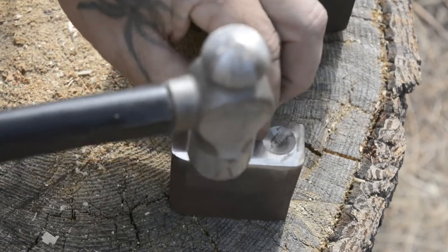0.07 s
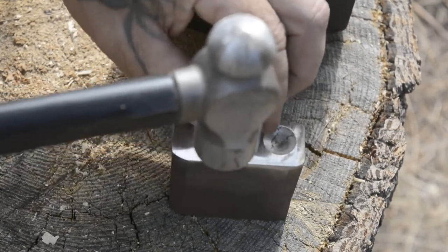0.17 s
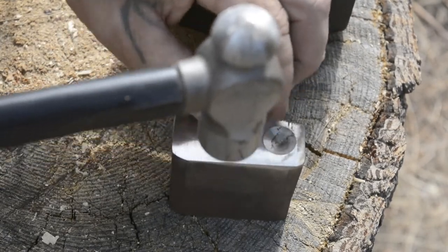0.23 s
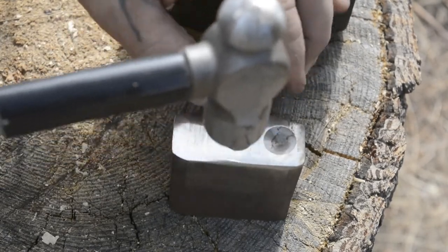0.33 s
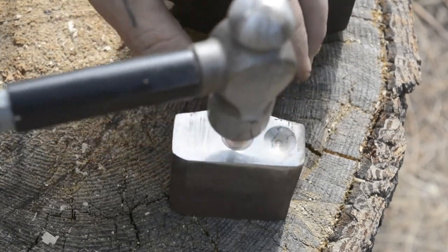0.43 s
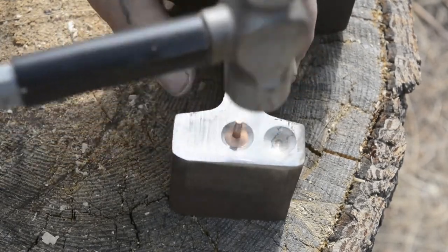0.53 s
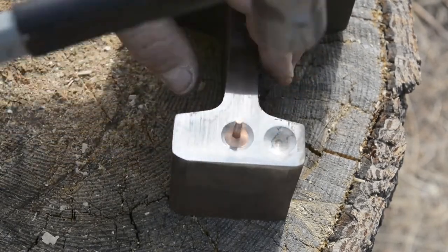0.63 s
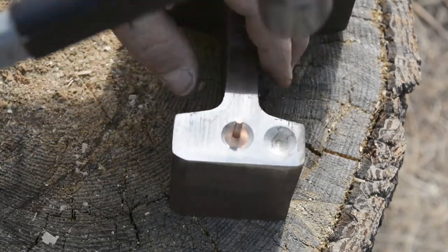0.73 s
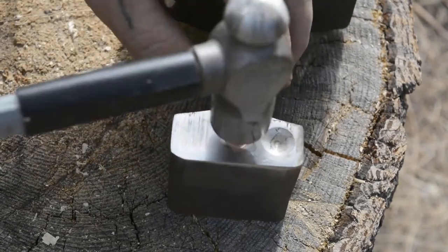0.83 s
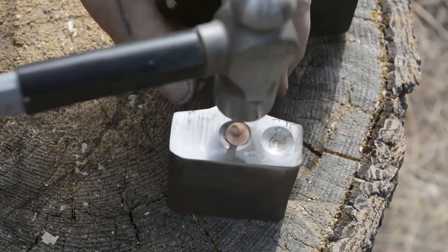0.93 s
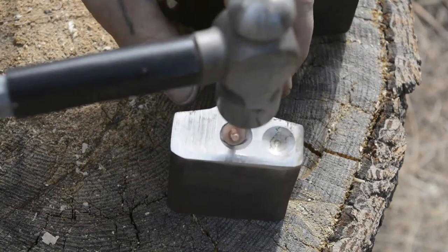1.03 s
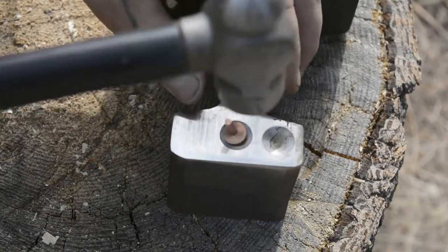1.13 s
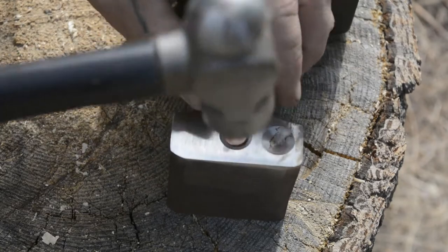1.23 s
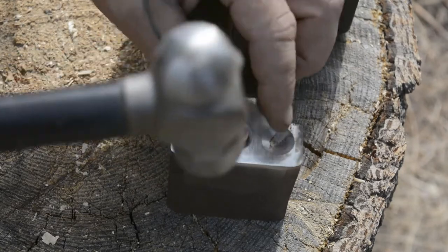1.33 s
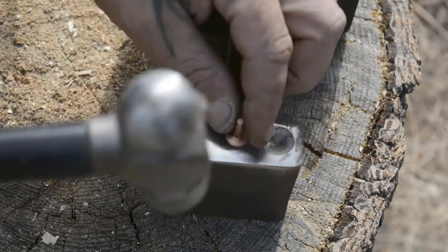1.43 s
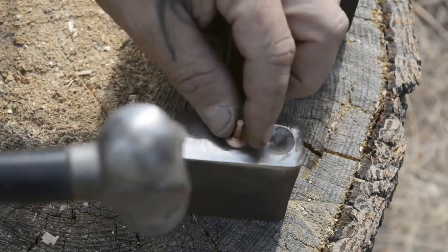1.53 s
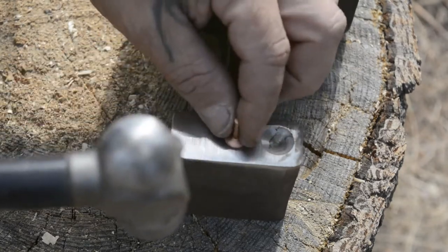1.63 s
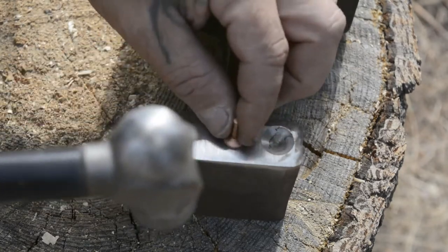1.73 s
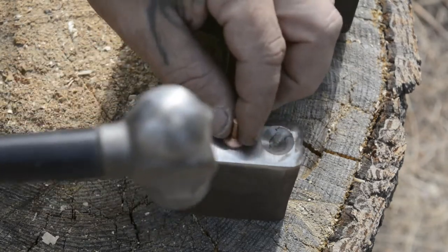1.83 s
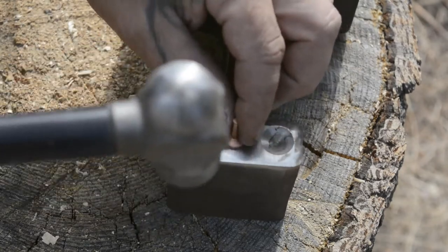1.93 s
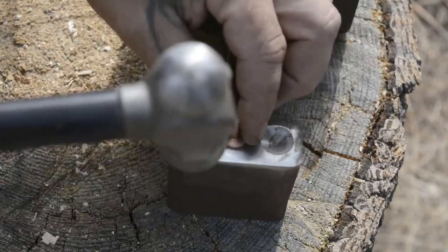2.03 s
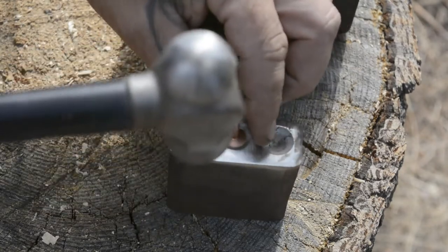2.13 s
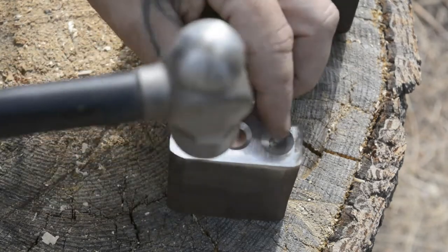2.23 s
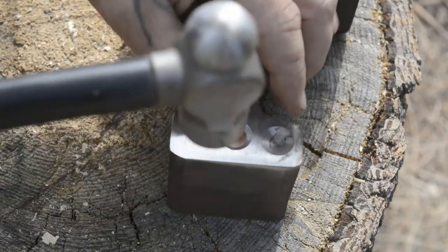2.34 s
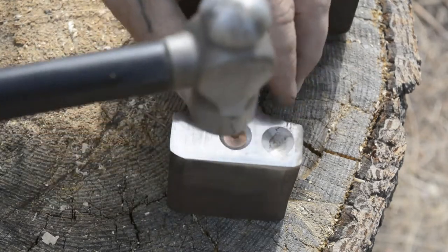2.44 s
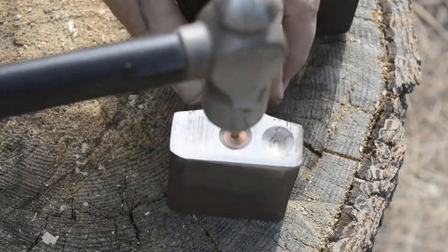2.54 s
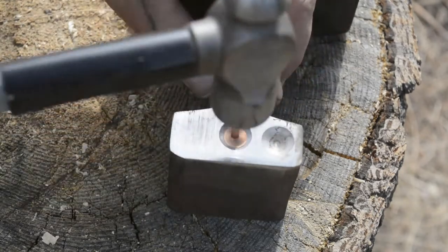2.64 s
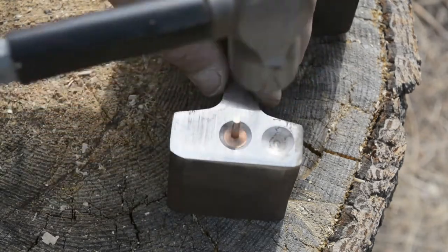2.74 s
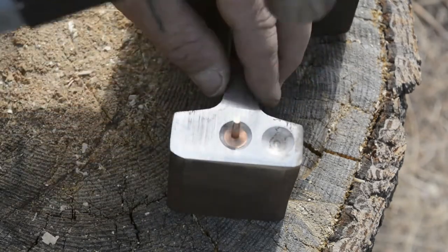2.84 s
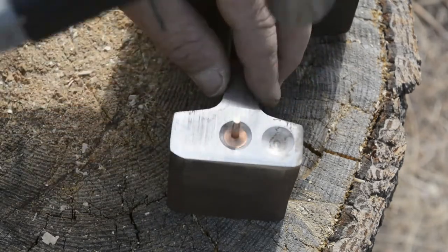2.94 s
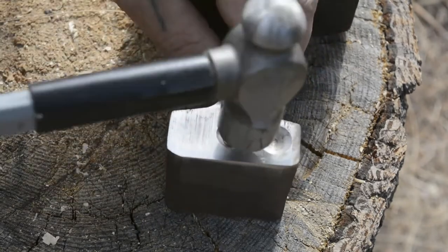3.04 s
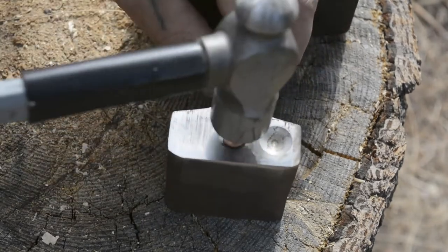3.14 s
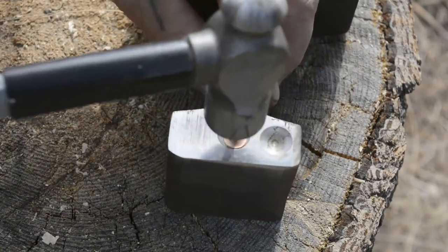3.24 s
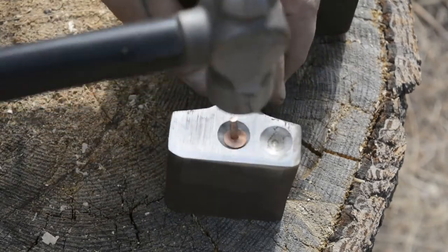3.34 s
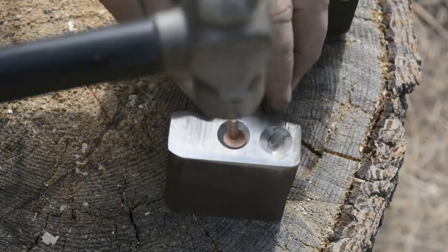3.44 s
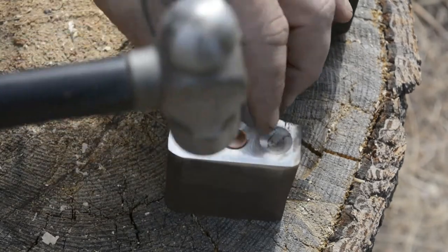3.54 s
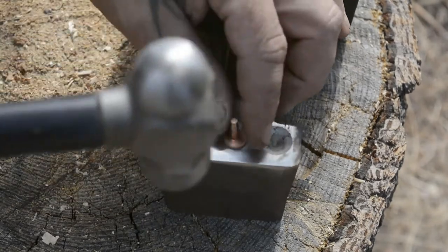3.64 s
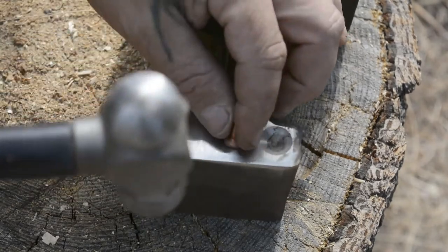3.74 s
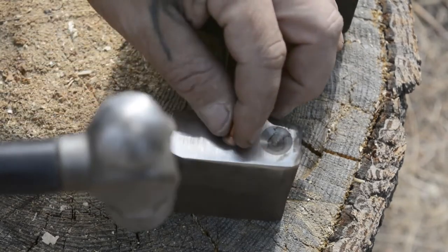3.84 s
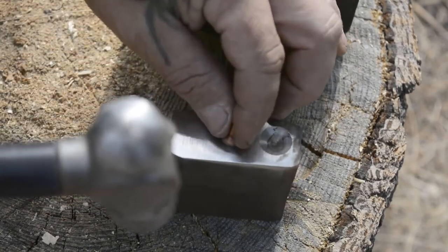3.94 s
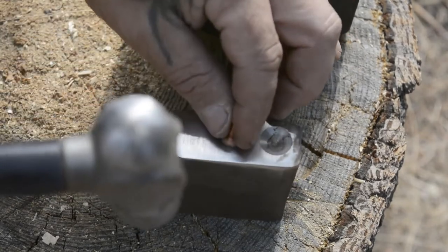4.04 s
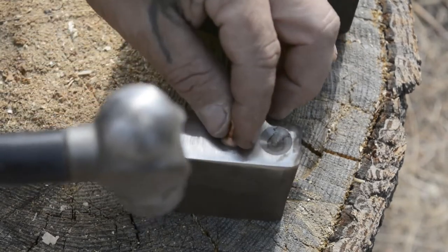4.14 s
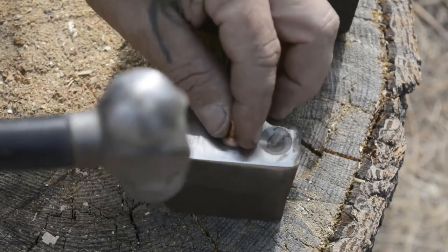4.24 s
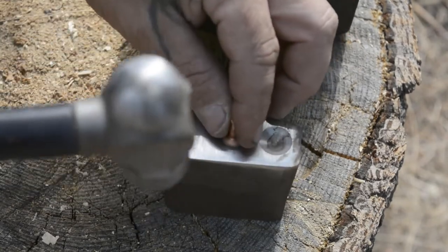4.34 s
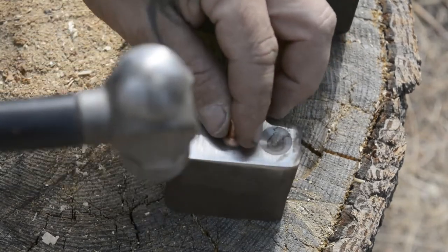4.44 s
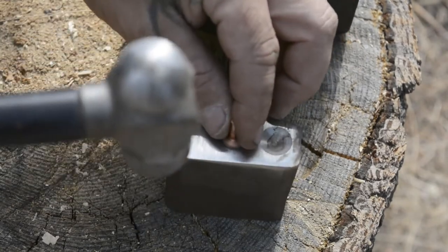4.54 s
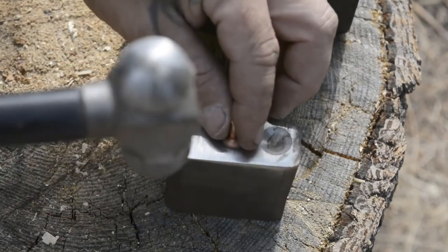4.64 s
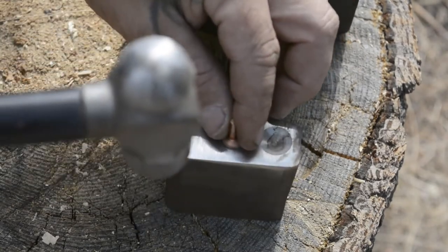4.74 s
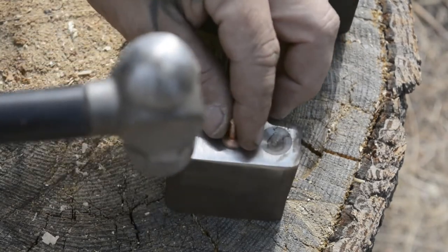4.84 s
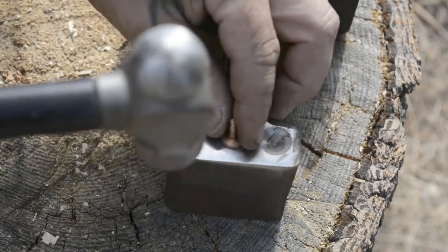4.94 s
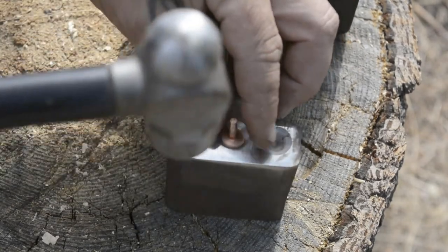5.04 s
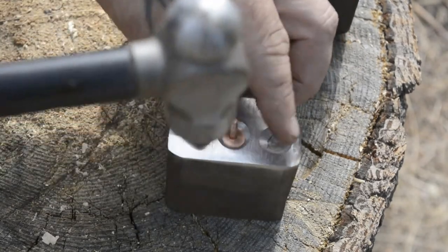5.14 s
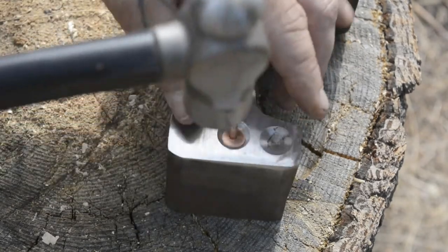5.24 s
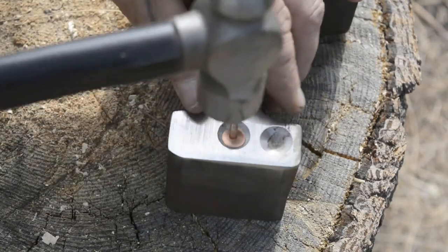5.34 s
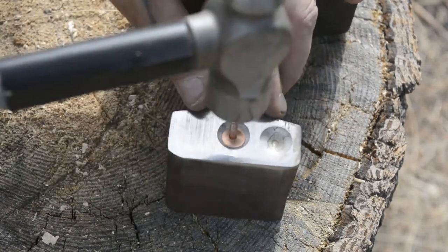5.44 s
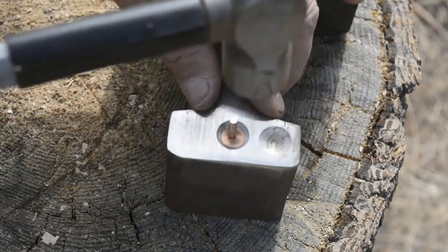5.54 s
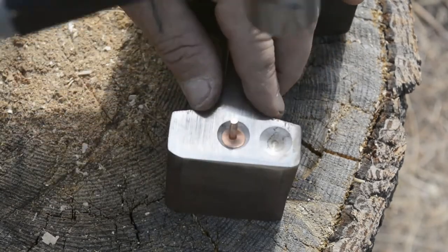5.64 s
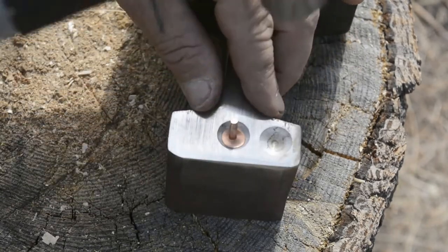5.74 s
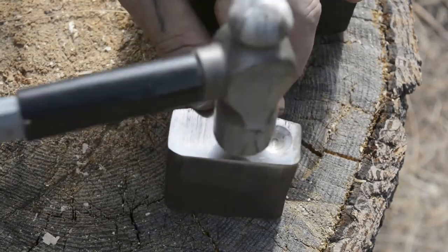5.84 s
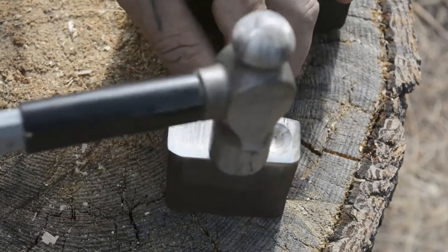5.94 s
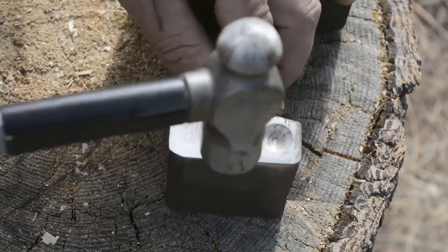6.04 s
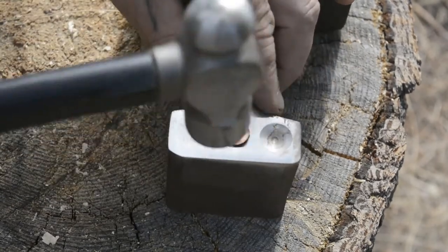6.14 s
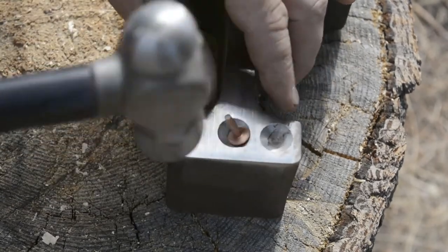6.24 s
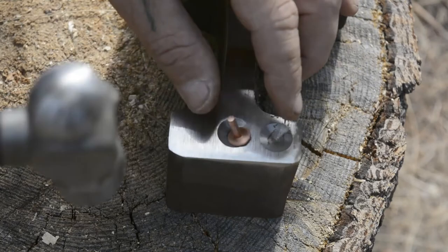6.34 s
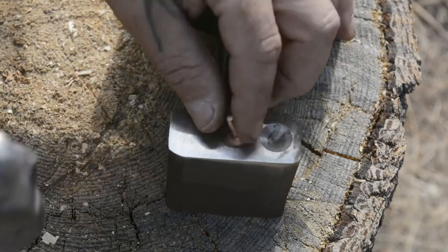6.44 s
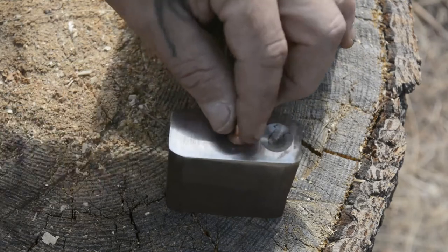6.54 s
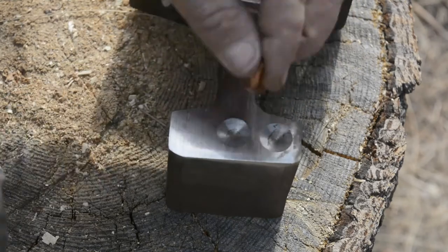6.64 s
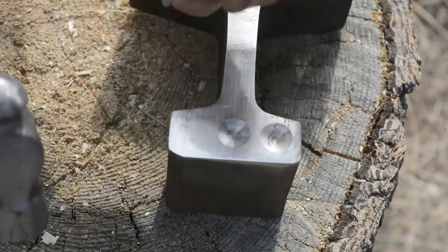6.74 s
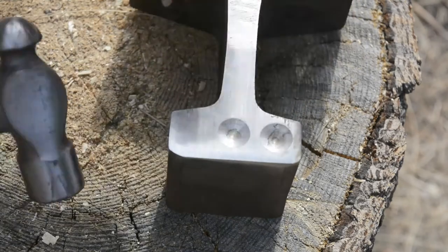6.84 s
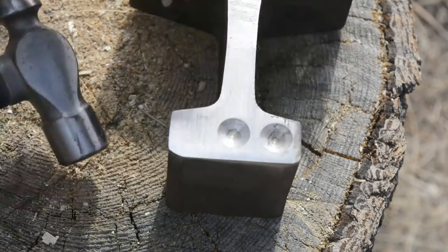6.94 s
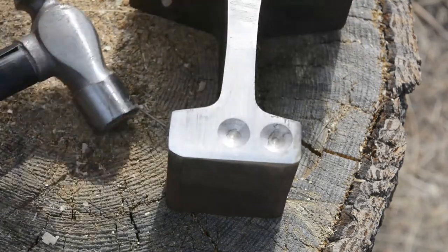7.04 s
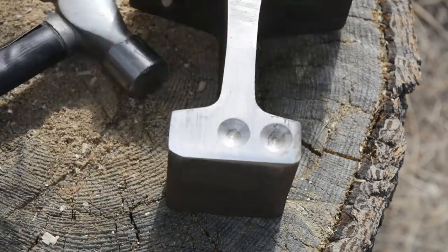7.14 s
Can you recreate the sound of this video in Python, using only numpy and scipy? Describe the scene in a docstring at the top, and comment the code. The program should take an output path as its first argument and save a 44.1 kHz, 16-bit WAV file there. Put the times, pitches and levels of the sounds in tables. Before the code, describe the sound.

Three isolated, very loud hammer hits on metal, close to the microphone, almost without echo. Each cracks and thuds through a stump, followed at once by quick fading knocks of the bouncing steel block, bright rivet clicks and a brief ring. The yard is quiet, with soft hiss, tiny low air bumps and faint buzzing spells. A very faint falling call precedes the second blow; the third is brightest, and a light wooden clank ends it.

```python
"""Riveting on a stump

Outdoors, close to the microphone, a ball-peen hammer sets a copper rivet in a steel block on a tree stump.
Each of three blows is a noise-burst crack, a filtered thump of stump modes and a ring of decaying sines;
the block hops, lands and bounces to rest in filtered pushes while noise-band clicks make the rivet tick.
A limiter ducks under each blow. Behind: noise for quiet air and hiss, a faint buzz of sines that comes
and goes, a thin whine, one falling call, perhaps a far bird; at the very end the hammer is put down.
"""
import sys
import numpy as np
from scipy import signal
from scipy.fft import rfft, irfft
from scipy.io import wavfile
from scipy.ndimage import uniform_filter1d, minimum_filter1d

SR = 44100
rng = np.random.default_rng(int(sys.argv[2]) if len(sys.argv) > 2 else 0)


def to_wav(s):
    """Save 16-bit WAV."""
    ch = np.atleast_2d(s).T  # columns
    pcm = np.round(np.clip(ch, -1, 1) * 32767)  # PCM
    wavfile.write(sys.argv[1], SR, pcm.astype(np.int16))


N = 316939
TIME = np.arange(N) / SR

# three hammer blows on the rivet; level_db belongs to the thump, contact_hz is its brightness:
# start_s [s], level_db [dB], contact_hz [Hz], crack_db [dB], clink_db [dB], ring_length [factor]
HAMMER_BLOWS = [(0.7612, 5.5, 1340, -6.5, -10, 0.89), (2.9607, 6, 1850, -11.5, -15, 0.94),
                (5.7779, 7, 3700, -8.5, -37, 0.8)]
# ringing modes of the steel block: pitch_hz [Hz], t60_s [s, before the ring_length of the blow]
STEEL_MODES = [(1711.5, .85), (2298, .6), (4705.5, .55), (5987, .5), (7192.5, .3), (9583, .38), (11600, .7),
               (12020, .12), (14400, .14)]
# each blow lands on another spot: one row a blow, one level_db [dB] a steel mode
STRIKE_LEVELS = [(-54, -33, -52.5, -42, -40.5, -43, -80, -47, -56),
                 (-45, -26, -43.5, -40.5, -33, -52.5, -67, -63, -75.5),
                 (-40.5, -23, -48, -42.5, -34, -55, -66, -56, -58)]
# steel meeting copper, the crack's relative spectrum: pitch_hz [Hz], level_db [dB]
CRACK_SPECTRUM = [(800, -34), (1900, 0), (3300, -4), (4400, 1), (5100, 6.5), (6100, 7.5), (7600, -7.5),
                  (9000, -1.5), (10700, 0), (13000, -3.5), (14000, -12), (15500, -15.5)]
# clank of the hammer head put down on the wood: pitch_hz [Hz], level_db [dB], t60_s [s]
CLANK_MODES = [(710, -33, 0.036), (1150, -19, 0.0082), (1650, -27, 0.057), (2520, -28, 0.0056),
               (7930, -45, .05)]
PUT_DOWN_S = 7.1803
CLINK_HZ, CLINK_T60_S = 2900, 0.012  # the rivet knocking in its seat under the blow


def hammer(crack_t60=0.0052, crack_rise_s=0.00045, ground_hz=55, ground_db=-38, ground_t60=0.045):
    """Crack and clink at the rivet, thump in wood and ground, thin ring in steel that the hand damps."""
    out = np.zeros(N)
    crack_shape = fade(crack_t60) * (1 - np.exp(-TIME[:SR] / crack_rise_s))
    for blow, spot in zip(HAMMER_BLOWS, STRIKE_LEVELS):
        start_s, level_db, contact_hz, crack_db, clink_db, ring_length = blow
        steel = sum(ring(pitch_hz, mode_db, ring_length * t60, start_s)
                    for (pitch_hz, t60), mode_db in zip(STEEL_MODES, spot))
        crack = undb(crack_db) * burst(crack_shape, CRACK_SPECTRUM)
        clink = ring(CLINK_HZ, clink_db, CLINK_T60_S)
        ground = ring(ground_hz, ground_db, ground_t60)
        add(out, start_s, thump(level_db, contact_hz) + ground + crack + clink + steel)
    add(out, PUT_DOWN_S, sum(ring(*mode) for mode in CLANK_MODES))
    return out


def burst(shape, spectrum):
    """A burst of random fine detail: an enveloped noise made even in level, then given a spectrum."""
    phases = np.angle(rfft(rng.standard_normal(SR) * shape))
    even = irfft(np.exp(1j * phases), SR)
    lead = SR // 2000  # 0.5 ms, keeps the onset that the filter spreads ahead of time
    sound = unit(np.roll(colour(even, spectrum), lead) * fade(.1))
    return sound * np.sqrt(np.mean(shape ** 2)) / shape.max()


# modes of the stump under the block, relative to the thump:
# pitch_hz [Hz], level_db [dB], t60_s [s, before the extra damping of the wood]
STUMP_MODES = [(186, -33.5, 0.04), (213, -30, 0.073), (237, -13.5, 0.018), (387, -20, 0.013),
               (467, -20.5, 0.07), (627, -21.5, 0.073), (790, -8.5, 0.066), (1119, -18, 0.058),
               (1317, -12.5, 0.027), (1397, -7.5, 0.024), (1705, -71, 0.018)]


def thump(db, contact_hz, held_t60=0.26, clack=(1585, 0, .0025), sink=(390, 1, .007), sink_hz=1400,
          lag_s=0.001, radiate_hz=105, top_hz=2900):
    """The block clacks and sinks; a moment later the stump answers. A softer contact is duller."""
    # clack and sink are heavily damped modes of the whole block: pitch_hz, level_db, t60_s
    block = ring(*clack) - cut(ring(*sink), sink_hz, "low")
    stump = sum(ring(*mode) for mode in STUMP_MODES)
    late_stump = np.interp(TIME[:SR] - lag_s, TIME[:SR], stump, left=0)
    wood = late_stump * fade(held_t60)  # extra damping of the wood
    body = cut(cut(block + wood, top_hz, "low"), top_hz, "low")
    return undb(db) * cut(cut(body, contact_hz, "low"), radiate_hz, "high")


# the block comes down after each blow; hop_keeps is the share of its length each next hop keeps:
# start_s [s], level_db [dB], contact_hz [Hz], first_hop_s [s], hop_keeps [share], bounce_loss_db [dB]
BLOCK_LANDINGS = [(0.814, -7, 890, .0305, 0.324, 14), (3.0105, -7, 1200, .024, .76, 4.5),
                  (5.819, -8, 1180, .018, .75, 7.5)]
# the block grazes the wood in mid-hop or is nudged by the fingers:
# start_s [s], level_db [dB], contact_hz [Hz]
BLOCK_TOUCHES = [(0.7877, -12.5, 1500), (2.9985, -15, 1100), (4.4380, -43, 1777), (4.476, -49, 1200)]
# later partials that lengthen the steel's ring after a blow:
# start_s [s], pitch_hz [Hz], level_db [dB], t60_s [s]
LATE_STEEL = [(0.8145, 1711.5, -53, .5), (0.8145, 2298, -48.5, 1.45), (3.0106, 7192.5, -49, .27),
              (5.819, 1711.5, -44, .85), (5.819, 7192.5, -47, .27), (5.837, 11600, -57, .6)]
# the loose rivet clicks against the steel: start_s [s], level_db [dB], pitch_hz [Hz], width_hz [Hz]
RIVET_TICKS = [(0.784, -12.5, 10500, 3000), (0.7955, -25, 10100, 7000), (0.8042, -22, 6500, 4000),
               (0.81, -27.5, 3300, 1500), (2.997, -25, 12000, 2000), (3.007, -16.5, 13000, 2000),
               (3.0673, -28.5, 12400, 1800), (5.8335, -19.5, 7500, 8000)]


def settling():
    """The block bounces to rest on the wood, the loose rivet clicks, late partials lengthen the ring."""
    out = np.zeros(N)
    for start_s, level_db, contact_hz, hop_s, keeps, loss_db in BLOCK_LANDINGS:
        add(out, start_s, undb(level_db) * knocks(bounces(hop_s, keeps, loss_db), contact_hz))
    for start_s, level_db, contact_hz in BLOCK_TOUCHES:
        add(out, start_s, undb(level_db) * knocks(bounces(0.023, 1, 0, count=1), contact_hz))
    for start_s, pitch_hz, level_db, t60 in LATE_STEEL:
        add(out, start_s, ring(pitch_hz, level_db, t60, start_s))
    for start_s, level_db, pitch_hz, width_hz in RIVET_TICKS:
        add(out, start_s, tick([(pitch_hz, width_hz, level_db)]))
    return out


CONTACT_KEEPS = 0.79  # share of the brightness left to each next, slower bounce
FAR_EDGE_S, FAR_EDGE_DB = 0.00774, -7  # the block lands askew: its far edge follows later and softer


def bounces(hop_s, keeps, loss_db, count=5):
    """Rows (s, dB, brightness share): each hop shorter, softer, duller; one edge lands, then the other."""
    s, contacts = 0, []
    for k in range(count):
        db, bright = -loss_db * k, CONTACT_KEEPS ** k
        contacts.append((s, db, bright))
        contacts.append((s + FAR_EDGE_S, db + FAR_EDGE_DB, bright))
        s += hop_s * min(keeps, 1) ** k
    return contacts


# rattle of the rivet in its seat whenever the block meets the wood:
# pitch_hz [Hz], width_hz [Hz], level_db [dB relative to the knock]
RIVET_RATTLE = [(3230, 1200, -29), (10000, 8300, -21)]
# tiny pushes from the sawdust after each contact: size beside the main push, and decay
SPRAY_SHARE, SPRAY_T60_S = .055, .02


def knocks(contacts, contact_hz, rock_hz=150, rock_db=-24, rock_t60=0.017):
    """The block meets the wood at each contact: it thumps, rocks and rattles the rivet."""
    pushes, out = np.zeros(SR), np.zeros(2 * SR)
    rock = ring(rock_hz, rock_db, rock_t60)
    spray = SPRAY_SHARE * fade(SPRAY_T60_S)[:SR // 10]
    for s, db, bright in contacts:
        # on uneven end grain and sawdust, a contact is one push and a spray of tiny ones
        push = spray * rng.standard_normal(len(spray))
        push[0] = 1
        add(pushes, s, undb(db) * cut(push, bright * contact_hz, "low"))
        add(out, s, undb(db) * rock)
        add(out, s, undb(db) * tick(RIVET_RATTLE))
    thumps = signal.fftconvolve(pushes, thump(0, contact_hz, held_t60=0.062))
    return out[:SR] + thumps[:SR]


def tick(bands, t60=0.011, rise_s=0.00081):
    """A short metallic click: noise in resonances of (pitch_hz, width_hz, level_db), quickly decaying."""
    size = SR // 16
    shape = (fade(t60) * (1 - np.exp(-TIME[:SR] / rise_s)))[:size]
    return shape * sum(undb(db) * band_noise(hz, width_hz, size) for hz, width_hz, db in bands)


def yard(x, wet_db=-24, t60=0.078, dull_hz=7000, side_db=-12):
    """Ground and nearby things scatter a little of each blow back, mostly from the front."""
    mid, side = cut(rng.standard_normal((2, SR)), dull_hz, "low") * fade(t60)
    tails = mid + undb(side_db) * side * np.array([[1], [-1]])
    tails = tails / np.sqrt(np.sum(mid ** 2))
    return x + undb(wet_db) * signal.fftconvolve(x[None], tails, axes=1)[:, :N]


# one falling call, perhaps a far bird: time_s [s], pitch_hz [Hz]
CALL_GLIDE = [(2.68, 2020), (2.708, 1661), (2.78, 1467), (2.82, 1410), (2.864, 1325), (2.91, 968),
              (2.93, 900)]
# its throat favours a narrow band: pitch_hz [Hz], level_db [dB]
THROAT_BAND = [(1200, -85), (1450, -64), (1700, -60), (2300, -57), (2650, -54), (2820, -48.5), (3000, -59),
               (3300, -67), (3700, -85)]
CALL_START_S, CALL_END_S, CALL_EDGE_S = 2.665, 2.935, 0.015


def far_call():
    """A thin tone glides down: its fundamental sinks below the throat band as its octave falls through it."""
    pitch = np.interp(TIME, *np.transpose(CALL_GLIDE))
    phase = 2 * np.pi * np.cumsum(pitch) / SR
    gate = np.clip(np.minimum(TIME - CALL_START_S, CALL_END_S - TIME) / CALL_EDGE_S, 0, 1)
    call = 0
    for k in (1, 2):
        throat_db = np.interp(k * pitch, *np.transpose(THROAT_BAND))
        call = call + undb(throat_db) * np.sin(k * phase)
    return gate * call


# spells of a faint buzz: start_s [s], end_s [s]
BUZZ_TIMES = [(1.43, 2.08), (3.92, 4.55), (6.95, 7.3)]
# partials of the buzz: pitch_hz [Hz], level_db [dB]
BUZZ_PARTIALS = [(142, -58.5), (284, -64.5), (567, -70)]


def buzz(edge_s=0.023, waver=0.0082):
    """A faint buzz of sines that switches on and off; one wavering clock unsteadies all partials."""
    gate = sum(np.clip(np.minimum(TIME - start, end - TIME) / edge_s, 0, 1) for start, end in BUZZ_TIMES)
    clock = np.cumsum(1 + waver * band_noise(3.26, 11.0, N)) / SR
    return gate * sum(undb(db) * np.sin(2 * np.pi * hz * clock) for hz, db in BUZZ_PARTIALS)


# relative spectrum of outdoor air and microphone hiss: pitch_hz [Hz], level_db [dB per Hz]
AIR_SPECTRUM = [(12, -38), (20, -0.5), (38, -5.5), (126, -7.5), (207, -14.5), (245, -12), (298, -16),
                (333, -14), (1340, -20.5), (10200, -24.5), (14300, -23), (15500, -25.5)]
# stereo width of that background: pitch_hz [Hz], side_minus_mid_db [dB]
AIR_WIDTH = [(80, -17.5), (300, -10), (1300, -7), (3000, -4.5), (15000, -3.5)]
# soft low bumps of air on the microphone: centre_s [s], level_db [dB]
AIR_BUMPS = [(0.42, -49), (2.45, -50), (5.42, -48.5), (6.41, -50), (6.93, -52)]


def air(air_db=-51.33, bump_hz=35, bump_width_hz=50, bump_s=0.036, whine_hz=13730, whine_db=-77,
        stir_db=1.28, stir_top_hz=1500):
    """Air and hiss as shaped noise, wider in the treble, with low bumps and a thin electronic whine."""
    mid, side = (unit(colour(rng.standard_normal(N), AIR_SPECTRUM)) for _ in range(2))
    bed = undb(air_db) * (mid + colour(side, AIR_WIDTH) * np.array([[1], [-1]]))
    # the outdoor air stirs a little; the hiss above it stays even
    stir = undb(stir_db * band_noise(2.4, 8.9, N)) - 1
    bed = bed + stir * colour_below(bed, stir_top_hz)
    swell = sum(undb(db) * np.exp(-((TIME - s) / bump_s) ** 2) for s, db in AIR_BUMPS)
    whine = undb(whine_db) * band_noise(whine_hz, 20, N)
    return bed + swell * band_noise(bump_hz, bump_width_hz, N) + whine


def undb(db):
    """Decibels to gain."""
    return 10 ** (np.asarray(db) / 20)


def unit(x):
    """Scale to rms 1."""
    return x / np.sqrt(np.mean(x ** 2))


def fade(t60):
    """One second of exponential decay, losing 60 dB in t60 seconds."""
    return np.exp(-np.log(1000) * TIME[:SR] / t60)


def ring(hz, db, t60, start_s=0):
    """One struck mode, a decaying sine; those given their start time keep in step with each other."""
    return undb(db) * np.sin(2 * np.pi * hz * (TIME[:SR] + start_s)) * fade(t60)


def cut(x, hz, kind):
    """Gentle low-pass or high-pass."""
    return signal.sosfilt(signal.butter(2, min(hz, SR / 2 - 1), kind, fs=SR, output="sos"), x)


def colour(x, points):
    """Filter by a spectrum of (pitch_hz, level_db) points."""
    hz, db = np.transpose(points)
    bins = np.maximum(np.fft.rfftfreq(len(x), 1 / SR), 1)
    gain = undb(np.interp(np.log(bins), np.log(hz), db))
    return irfft(rfft(x) * gain, len(x))


def colour_below(x, hz):
    """The part of a sound under a frequency, without delay."""
    return signal.sosfiltfilt(signal.butter(1, hz, fs=SR, output="sos"), x)


def band_noise(hz, width_hz, size):
    """Noise in one resonance, rms 1."""
    bins = np.fft.rfftfreq(size, 1 / SR)
    resonance = 1 + ((bins - hz) / (width_hz / 2)) ** 2
    return unit(irfft(rfft(rng.standard_normal(size)) / resonance, size))


def add(track, s, sound):
    """Mix a sound in from time s."""
    start = int(round(s * SR))
    track[start:start + len(sound)] += sound[:N - start]


def scene():
    """The work on the stump in the middle, the quiet outdoors around it."""
    return yard(hammer() + settling()) + far_call() + buzz() + air()


CEILING_DB = -.4


def limiter(x, release_db_per_s=70, size=24):
    """Gain drops just ahead of a peak, within size samples, and climbs back at a steady rate."""
    peak_db = 20 * np.log10(np.abs(x).max(axis=0) + 1e-9)
    over_db = np.maximum(peak_db - CEILING_DB, 0)
    climb_db = release_db_per_s * TIME
    gain = undb(climb_db - np.maximum.accumulate(over_db + climb_db))
    return x * uniform_filter1d(minimum_filter1d(gain, size), size)


TOP_HZ = 15900


def record(dry):
    """The microphone signal is limited at the blows; its band ends steeply before and after the limiter."""
    top = signal.ellip(10, .02, 60, TOP_HZ, fs=SR, output="sos")
    return signal.sosfiltfilt(top, limiter(signal.sosfilt(top, dry)))


dry = scene()
out = record(dry)
to_wav(out)
```